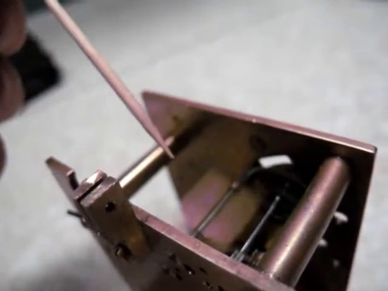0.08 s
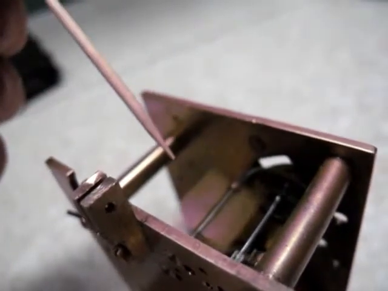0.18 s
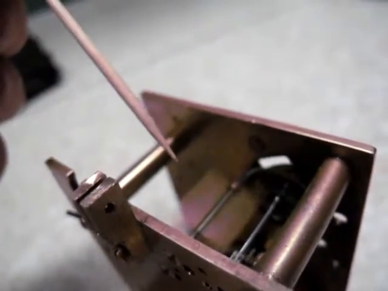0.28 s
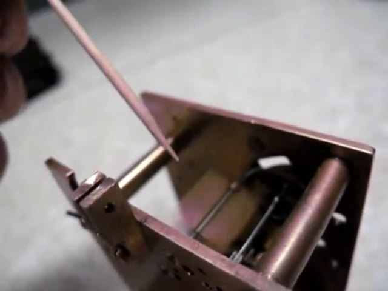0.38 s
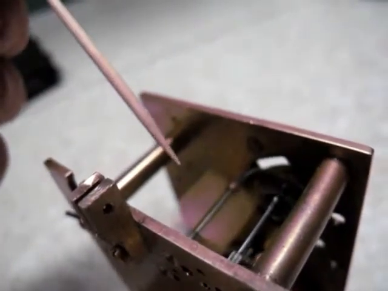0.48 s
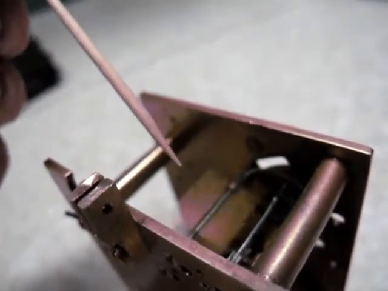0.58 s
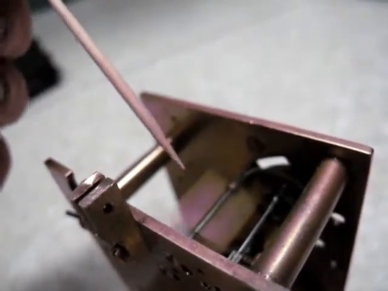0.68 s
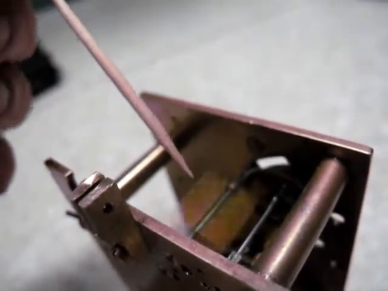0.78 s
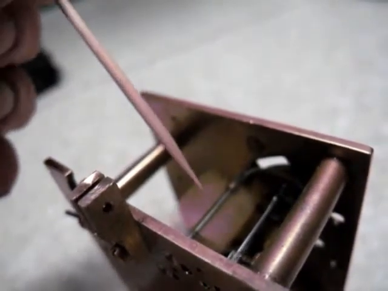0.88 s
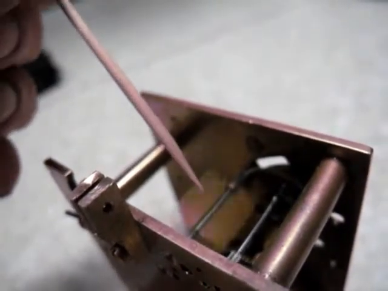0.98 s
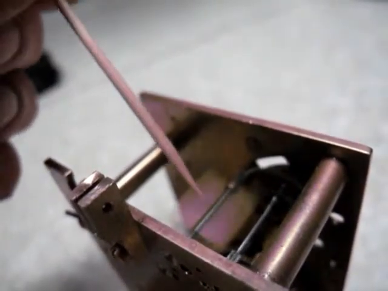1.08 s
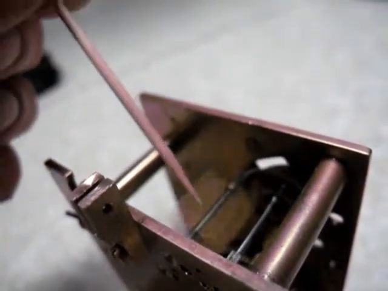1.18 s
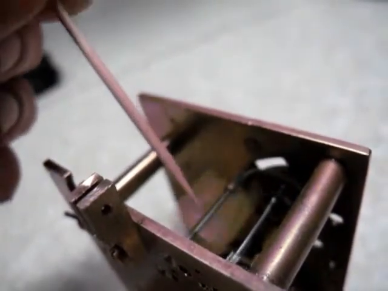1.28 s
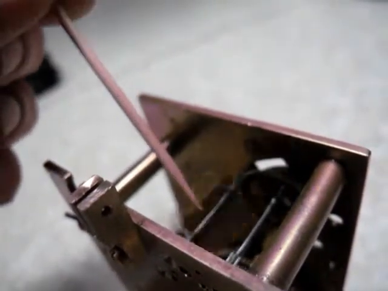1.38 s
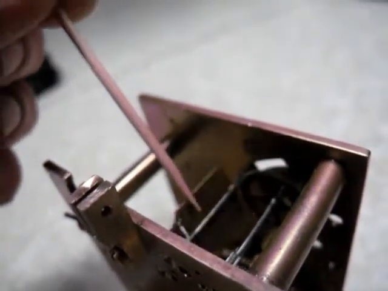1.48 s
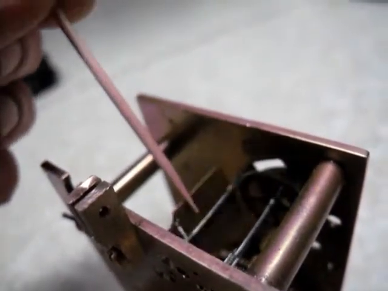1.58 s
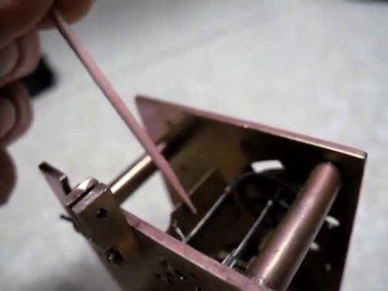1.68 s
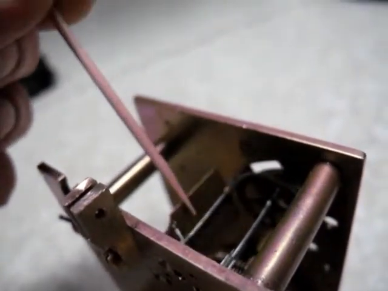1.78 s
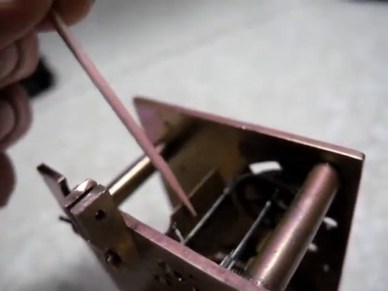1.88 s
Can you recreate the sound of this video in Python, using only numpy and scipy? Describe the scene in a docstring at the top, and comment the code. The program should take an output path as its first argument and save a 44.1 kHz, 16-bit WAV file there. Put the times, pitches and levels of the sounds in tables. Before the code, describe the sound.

A brass clockwork gear train whirs close up in a small room, bright and hissy, with tinkling teeth and irregular light knocks, speeding up and growing louder from 0 to 1.2 seconds. Faint scrapes begin near 1.17; from 1.28 to 1.45 a loud, dry rattle of about a dozen wooden slaps stops it. Weak ticks follow at 1.55 and 1.61, over low room noise and a thin steady whine.

```python
"""Stick stops a clockwork fan fly

A brass gear train runs up on a bench: teeth ring the brass, rubbing metal hisses, arbors knock in their pivots.
A wooden stick is lowered into the fan fly: grazes, then a dozen or so slaps (struck decaying modes); the train stops.
Two small ticks follow as the fly settles. Filtered noise and a sine make the room noise and a thin steady whine."""
import sys
import numpy as np
from scipy import signal
from scipy.fft import rfft, irfft
from scipy.io import wavfile

SR = 44100
rng = np.random.default_rng(int(sys.argv[2]) if len(sys.argv) > 2 else 0)


def wrap_up_sound(samples):
    """Save the sound to the file named by the first command line argument, as 16-bit audio."""
    columns = np.atleast_2d(samples).T
    # keep every value between -1 and 1, then stretch to whole-number steps
    tamed = np.clip(columns, -1, 1)
    steps = np.round(tamed * 32767).astype(np.int16)
    wavfile.write(sys.argv[1], SR, steps)


N = 85995
TIME_S = np.arange(N) / SR
BINS_HZ = np.fft.rfftfreq(2 * N, 1 / SR)  # zero-padded to 2N


def from_db(db):
    """Decibels to amplitude gain."""
    return 10 ** (np.asarray(db) / 20)


def rms_one(x):
    """Scale to unit rms."""
    return x / np.sqrt(np.mean(x ** 2) + 1e-20)


def curve(table):
    """Interpolate a (time, value) table at every sample."""
    return np.interp(TIME_S, *np.transpose(table))


def colour(x, spectrum):
    """Filter by a smooth spectrum, keeping the power of white noise."""
    hz, db = np.transpose(spectrum)
    gain_db = np.interp(np.log(BINS_HZ + 1), np.log(hz), db)
    gain = rms_one(from_db(gain_db))
    return irfft(rfft(x, 2 * N) * gain)[:N]


def clicks(times_s, db):
    """One impulse for each contact."""
    out = np.zeros(N)
    samples = np.round(np.asarray(times_s) * SR).astype(int)
    np.add.at(out, np.clip(samples, 0, N - 1), from_db(db))
    return out


def pole_radius(t60_s):
    """Per-sample decay that falls 60 dB in t60."""
    return from_db(-60 / (t60_s * SR))


def ring(x, hz, t60_s):
    """Two-pole resonator: a unit click starts a decaying sine of initial height 1."""
    r, w = pole_radius(t60_s), 2 * np.pi * hz / SR
    return signal.lfilter([0, np.sin(w)], [1, -2 * r * np.cos(w), r * r], x + 1e-18)


def bursts(hits, t60_s):
    """White noise under an exponential decay after each impulse."""
    envelope = signal.lfilter([1], [1, -pole_radius(t60_s)], hits + 1e-18)
    return envelope * rng.standard_normal(N)


# fan fly speed: t/s, speed/(turns/s)
FLY_SPEED = [(0, 28), (.4, 43), (1.3, 54), (1.41, 31), (1.47, 0)]
# relative force in the train: t/s, level/dB
TRAIN_FORCE = [(0, -9), (.09, -8), (.14, -4), (.32, -3), (.62, -1), (.9, 1), (1.12, 2), (1.19, 2.5),
               (1.275, 1), (1.34, 4.5), (1.412, 2), (1.435, -10), (1.47, -36)]
# spectrum of sliding teeth and pivots: f/Hz, relative density/dB
FRICTION = [(200, -18), (380, -1.5), (600, -11.5), (1200, -6), (2300, -7), (3000, 1), (4100, 4.5),
            (4600, -8), (5150, -1.5), (6700, -3), (8600, 1), (10700, 2.5), (12300, -17), (15500, -18)]
CLASHES_PER_TURN = 4
TURN_SWELL_DB = 1  # mesh tightens once a turn
TEETH_LOW_DB, TEETH_HIGH_DB, TOOTH_SPREAD_DB = -38.5, -31.5, 5
MAX_GRITS_PER_S, GRIT_SPREAD_DB, GRIT_T60_S = 700, 0.5, 0.0089  # rate at top speed
GRIT_DB, RUB_DB = -45, -48.5


def running_train():
    """Teeth clash at a rate set by the fly and ring the brass; metal rubs and slips in tiny bursts."""
    speed = curve(FLY_SPEED)
    turns = np.cumsum(speed) / SR
    force = from_db(curve(TRAIN_FORCE) + TURN_SWELL_DB * np.sin(2 * np.pi * turns))

    slip_sizes = from_db(GRIT_SPREAD_DB * np.minimum(rng.exponential(1, N), 3))
    slip_chance = MAX_GRITS_PER_S * speed / speed.max() / SR
    slips = slip_sizes * (rng.random(N) < slip_chance)
    grit = from_db(GRIT_DB) * rms_one(bursts(slips, GRIT_T60_S))
    rub = from_db(RUB_DB) * rng.standard_normal(N)
    friction = colour(force * (grit + rub), FRICTION)

    clash_count = int(turns[-1] * CLASHES_PER_TURN)
    late, low, high = rng.uniform(-1, 1, (clash_count, 3)).T
    clash_turns = (np.arange(clash_count) + .5 * late) / CLASHES_PER_TURN
    times_s = np.interp(clash_turns, turns, TIME_S)
    low_hits = force * clicks(times_s, TEETH_LOW_DB + TOOTH_SPREAD_DB * low)
    high_hits = force * clicks(times_s, TEETH_HIGH_DB + TOOTH_SPREAD_DB * high)
    return friction + brass(low_hits, high_hits)


# modes of wheels and plates: f/Hz, level/dB, t60/s
BRASS_MODES = [(3247, -13.5, 0.058), (3295, -9, 0.039), (3655, -15, 0.031), (3820, -25.5, 0.014),
               (5030, -10, 0.019), (5990, -13.5, 0.018), (7800, -34, 0.0095), (8385, -10, 0.033),
               (8407, -12.5, 0.032), (8540, -21.5, 0.034), (8850, -25, .02), (9200, -33, 0.073),
               (10280, -22.5, 0.021)]
SPLIT_HZ = 6500


def brass(low_hits, high_hits):
    """Wheels and plates ring; modes below and above SPLIT_HZ are struck separately."""
    total = 0
    for hz, db, t60_s in BRASS_MODES:
        hits = low_hits if hz < SPLIT_HZ else high_hits
        total = total + from_db(db) * ring(hits, hz, t60_s)
    return light(total)


LIGHT_LOW_HZ = 2330


def light(x):
    """High-pass: light contacts hardly move the frame at low frequencies."""
    return signal.sosfilt(signal.butter(2, LIGHT_LOW_HZ, "high", fs=SR, output="sos"), x)


# vane on stick: t/s, relative snap level/dB, brass strike level/dB
SLAPS = [(1.2852, -8.5, -25), (1.3016, -10, -49), (1.3114, -8, -31), (1.3200, -9, -48), (1.3298, -11, -35),
         (1.3396, -7, -44), (1.3510, -10.5, -31), (1.3612, -8, -39), (1.374, -11, -50), (1.3866, -8.5, -35),
         (1.4019, -10.5, -29), (1.4183, -10, -35), (1.4478, -16.5, -29.5), (1.5533, -26, -51),
         (1.6149, -43, -62)]
# modes of vane and stick together: f/Hz, relative level/dB, t60/s
VANE_MODES = [(980, -24, 0.0032), (2210, -18.5, 0.0065), (3990, -13.5, 0.0031), (6100, -8.5, 0.0025),
              (7280, -14, 0.0059), (8860, -3.5, 0.0032), (10540, -5, 0.0017), (14400, -11.5, 0.00052)]
SNAP_DB = -1
BUZZ_DB, BUZZ_T60_S, BUZZ_DELAY_S = -20.5, 0.011, .0005
THUD_DB, THUD_T60_S = -27.5, 0.021
THUD_LOW_HZ, THUD_HIGH_HZ = 306, 2420
SLAP_HIGH_RING_DB = -7  # wood excites high modes less


def vane_slaps():
    """Each slap: dry modal snap, short buzz of vane on wood, soft noise thud, ring of the movement."""
    times_s, snap_db, ring_db = np.transpose(SLAPS)
    hits = clicks(times_s, snap_db)
    buzz = bursts(clicks(times_s + BUZZ_DELAY_S, snap_db), BUZZ_T60_S)
    contact = hits + from_db(BUZZ_DB) * buzz
    snap = 0
    for k, (hz, db, t60_s) in enumerate(VANE_MODES):
        snap = snap + (-1) ** k * from_db(db) * ring(contact, hz, t60_s)  # alternate polarity
    thud_band = signal.butter(2, (THUD_LOW_HZ, THUD_HIGH_HZ), "band", fs=SR, output="sos")
    thud = signal.sosfilt(thud_band, bursts(hits, THUD_T60_S))
    movement = brass(clicks(times_s, ring_db), clicks(times_s, ring_db + SLAP_HIGH_RING_DB))
    return from_db(SNAP_DB) * snap + from_db(THUD_DB) * thud + movement


# arbors in their pivots: t/s, relative low-mode level/dB, relative high-mode level/dB
KNOCKS = [(0.034, -40.5, -57), (0.094, -35.5, -61), (.147, -48, -37), (.165, -44, -38), (.2435, -32, -27.5),
          (.303, -31.5, -35), (.321, -32, -48), (.359, -35.5, -40), (.406, -34, -51), (.466, -48, -27),
          (.512, -37, -29.5), (0.535, -40, -49), (0.562, -46, -35), (.584, -33, -47), (.619, -35, -28),
          (.661, -34, -31), (0.699, -35, -27), (.767, -29.5, -42), (0.806, -33.5, -28.5), (0.918, -31, -31),
          (0.953, -49, -25), (1.035, -30.5, -54), (1.06, -33.5, -38), (1.092, -31, -38.5),
          (1.127, -46, -23.5), (1.170, -26, -41), (1.18, -53, -30.5), (1.201, -27, -46),
          (1.222, -24.5, -48), (1.25, -46, -21.5), (1.410, -29, -41.5)]
KNOCK_DB, KNOCK_SCRAPE_DB, KNOCK_SCRAPE_T60_S = 3.5, -8.5, .016


def pivot_knocks():
    """Each knock strikes low and high brass modes unequally and scrapes briefly."""
    times_s, low_db, high_db = np.transpose(KNOCKS)
    low_hits, high_hits = clicks(times_s, low_db), clicks(times_s, high_db)
    scrape = light(colour(bursts(low_hits, KNOCK_SCRAPE_T60_S), FRICTION))
    return from_db(KNOCK_DB) * brass(low_hits, high_hits) + from_db(KNOCK_SCRAPE_DB) * scrape


# vanes first graze the stick's tip: t/s, level/dB
GRAZES = [(1.166, -30), (1.176, -37), (1.200, -33.5), (1.22, -27.5)]
GRAZE_T60_S = 0.025
SQUEAK_HZ, SQUEAK_T60_S, SQUEAK_DB = 9940, 0.068, -21.5


def vane_grazes():
    """Brief noise rubs of brass on wood, driving one high resonance."""
    rub = bursts(clicks(*np.transpose(GRAZES)), GRAZE_T60_S)
    squeak = from_db(SQUEAK_DB) * ring(rub, SQUEAK_HZ, SQUEAK_T60_S)
    return light(colour(rub, FRICTION)) + squeak


ROOM_DB, ROOM_T60_S, ROOM_DELAY_S = -12, 0.21, .002


def room(x):
    """Diffuse tail from bench and walls: convolution with decaying noise of unit energy."""
    decay = from_db(-60 * TIME_S / ROOM_T60_S) * (TIME_S > ROOM_DELAY_S)
    tail = rng.standard_normal(N) * decay
    return from_db(ROOM_DB) * signal.fftconvolve(x, tail / np.linalg.norm(tail))[:N]


# room noise spectrum: f/Hz, relative density/dB
FLOOR_SPECTRUM = [(20, -7), (45, 3.5), (65, -8.5), (92, 5), (125, -3), (190, 1.5), (400, -7), (1000, -10),
                  (3000, -17.5), (7000, -24.5), (10500, -27), (15500, -35)]
# room noise: t/s, level/dB
FLOOR_LEVEL = [(0, -56), (1.68, -56), (1.78, -55.5), (1.95, -56.5)]
WHINE_HZ, WHINE_RMS_DB = 5893, -61


def background():
    """Coloured room noise and a thin electrical whine, a steady sine."""
    noise = from_db(curve(FLOOR_LEVEL)) * colour(rng.standard_normal(N), FLOOR_SPECTRUM)
    whine = np.sqrt(2) * np.sin(2 * np.pi * WHINE_HZ * TIME_S)  # unit rms
    return noise + from_db(WHINE_RMS_DB) * whine


def scene():
    """The movement, close up in a small room."""
    clock = running_train() + vane_slaps() + pivot_knocks() + vane_grazes()
    return (clock + room(clock) + background())[None]


NOTCH_HZ, NOTCH_WIDTH_HZ = 11850, 840  # width of each of two passes
CUTOFF_HZ = 15800


def record(dry):
    """Microphone response: a notch applied twice, then a steep low-pass."""
    notch = signal.iirnotch(NOTCH_HZ, NOTCH_HZ / NOTCH_WIDTH_HZ, fs=SR)
    notched = signal.lfilter(*notch, signal.lfilter(*notch, dry))
    return signal.sosfilt(signal.ellip(10, .3, 70, CUTOFF_HZ, fs=SR, output="sos"), notched)


dry = scene()
out = record(dry)
wrap_up_sound(out)
```